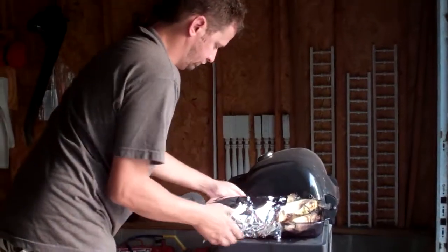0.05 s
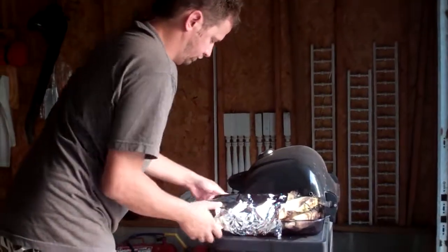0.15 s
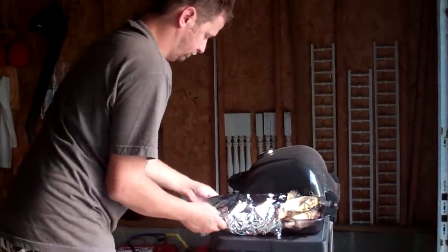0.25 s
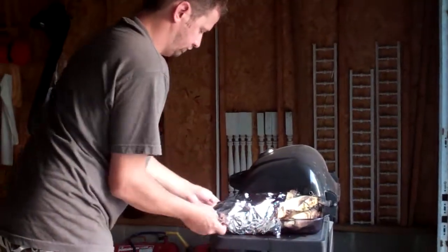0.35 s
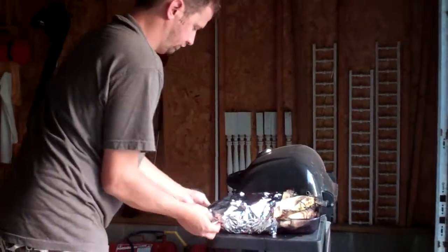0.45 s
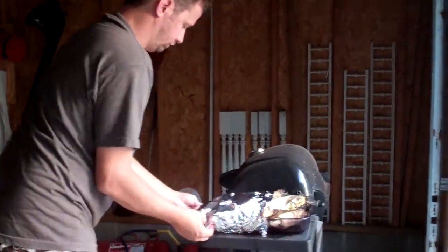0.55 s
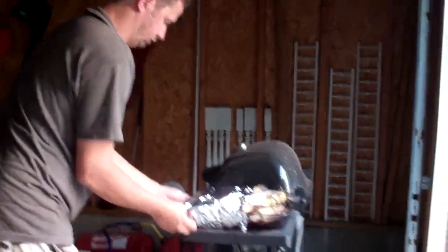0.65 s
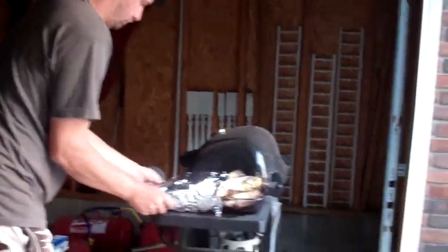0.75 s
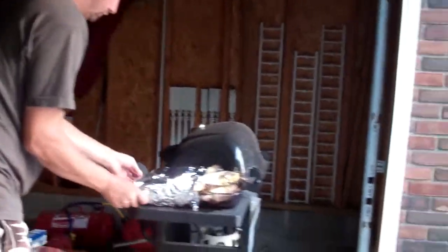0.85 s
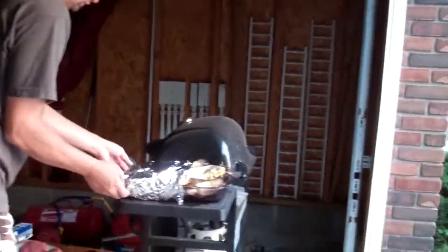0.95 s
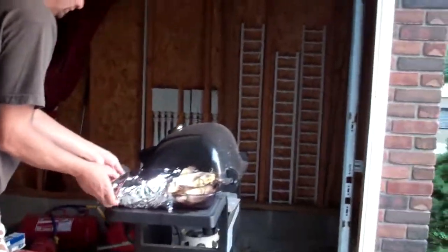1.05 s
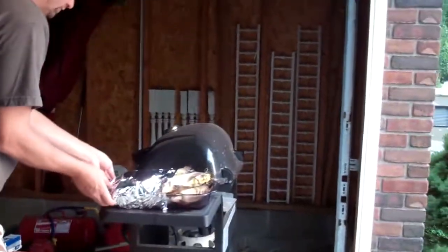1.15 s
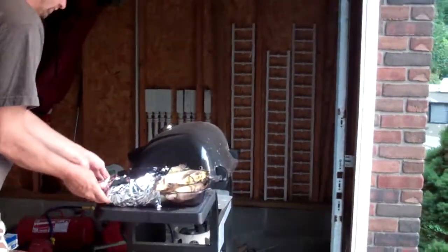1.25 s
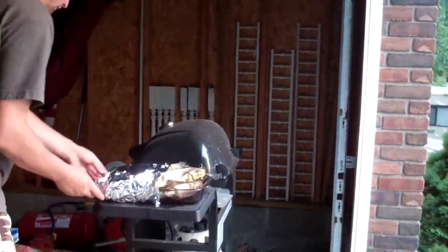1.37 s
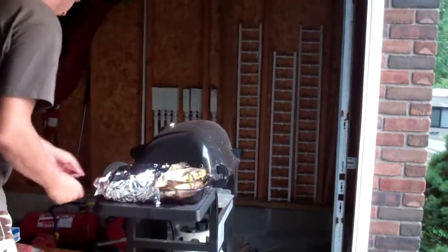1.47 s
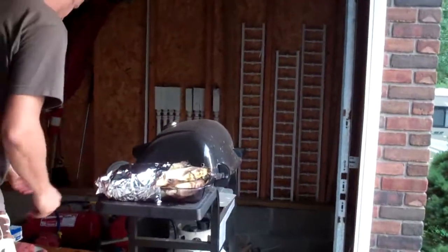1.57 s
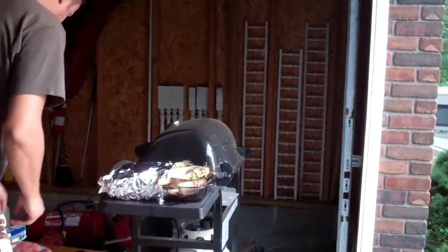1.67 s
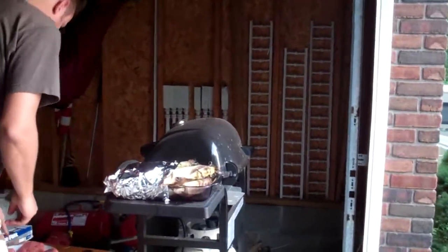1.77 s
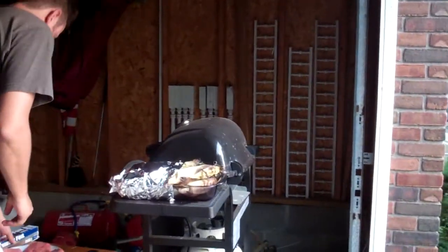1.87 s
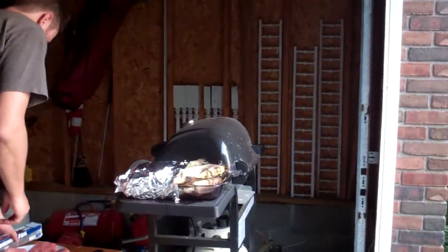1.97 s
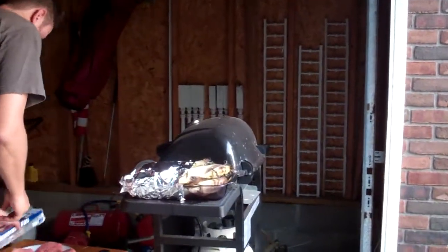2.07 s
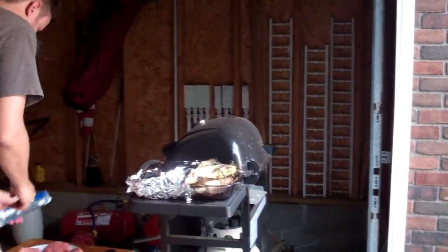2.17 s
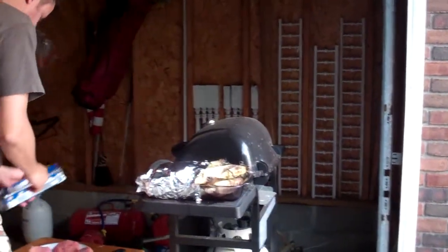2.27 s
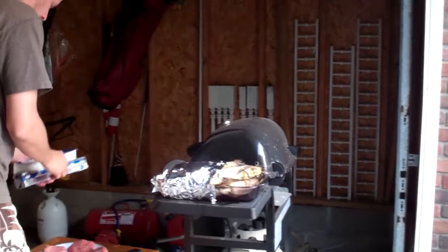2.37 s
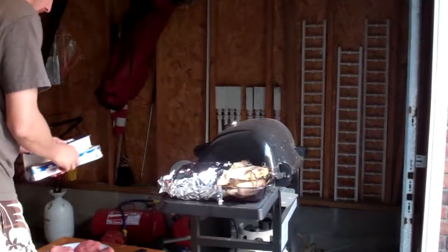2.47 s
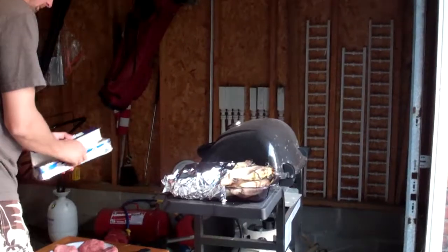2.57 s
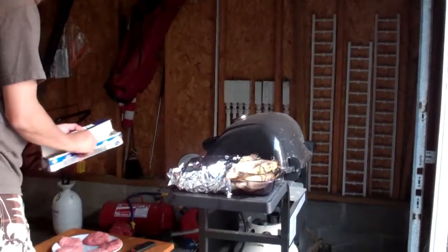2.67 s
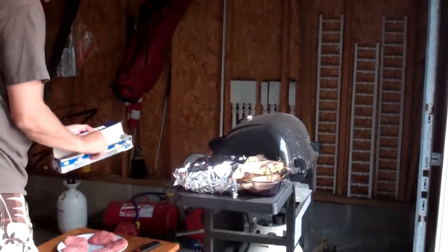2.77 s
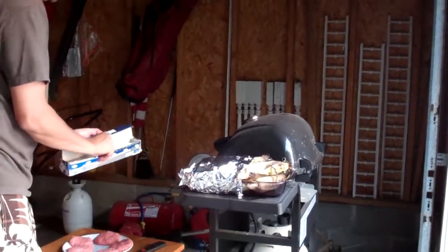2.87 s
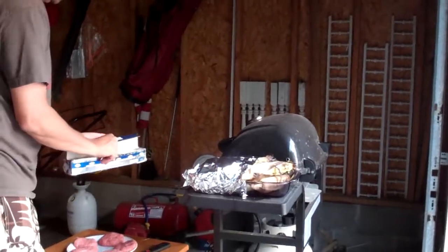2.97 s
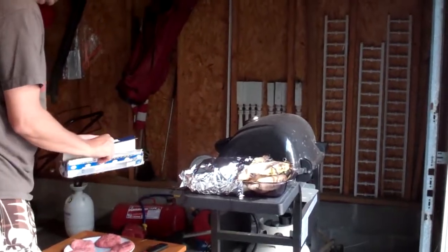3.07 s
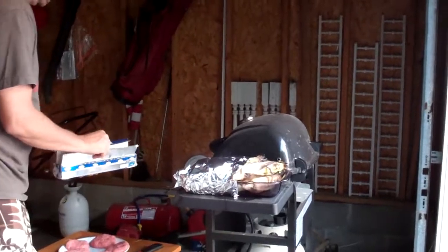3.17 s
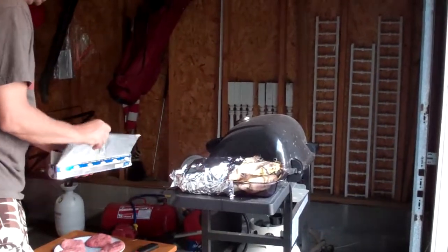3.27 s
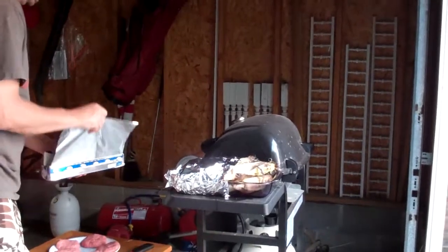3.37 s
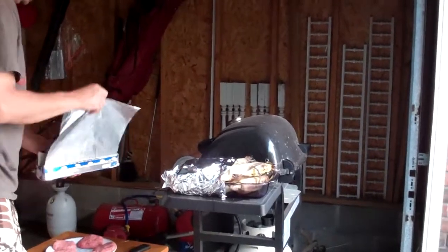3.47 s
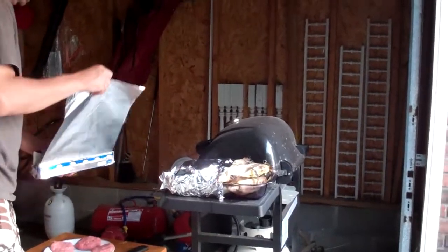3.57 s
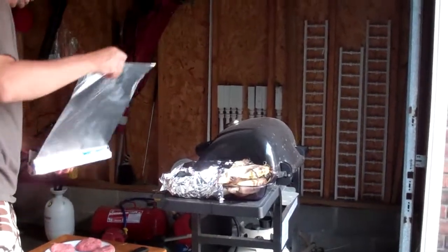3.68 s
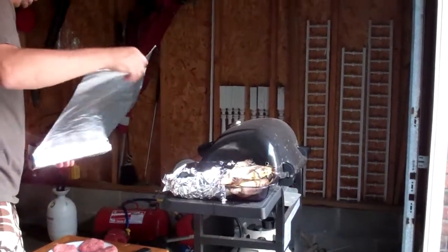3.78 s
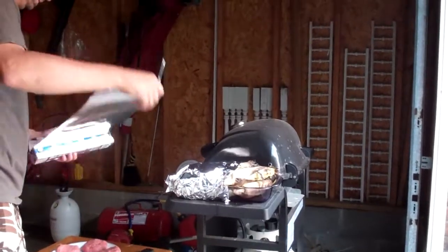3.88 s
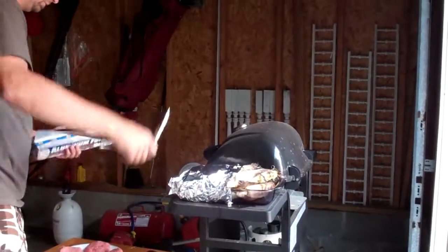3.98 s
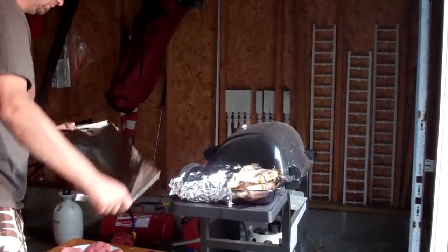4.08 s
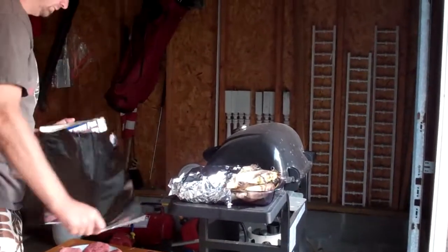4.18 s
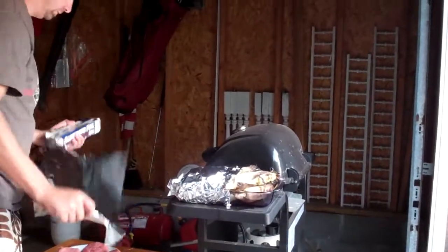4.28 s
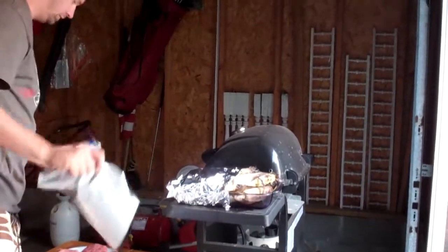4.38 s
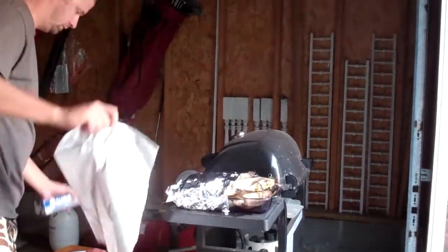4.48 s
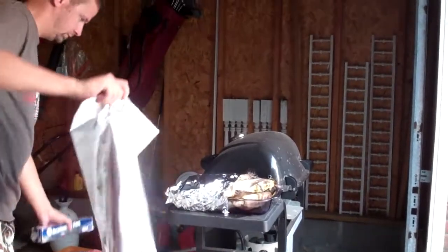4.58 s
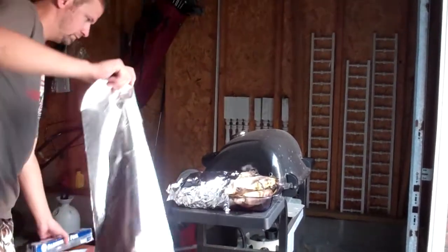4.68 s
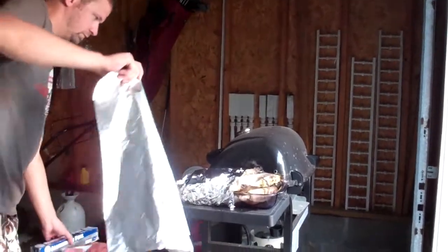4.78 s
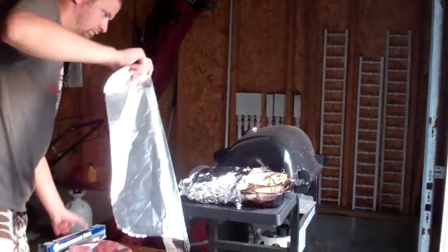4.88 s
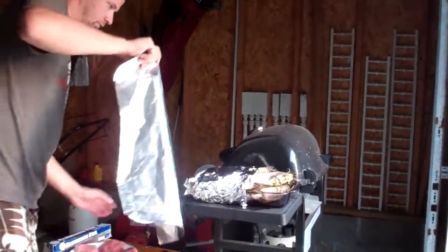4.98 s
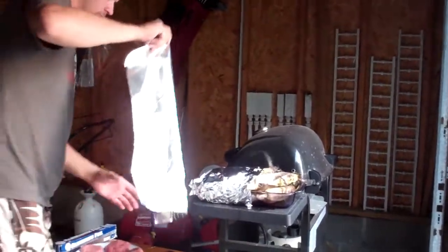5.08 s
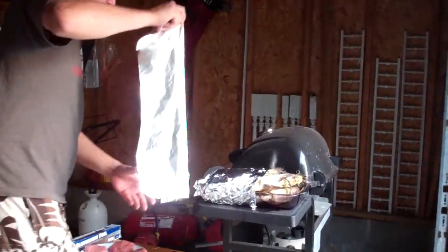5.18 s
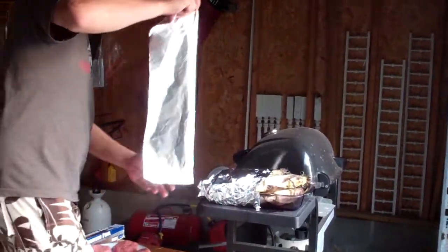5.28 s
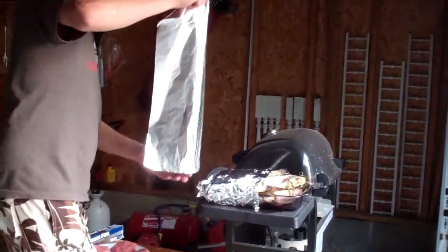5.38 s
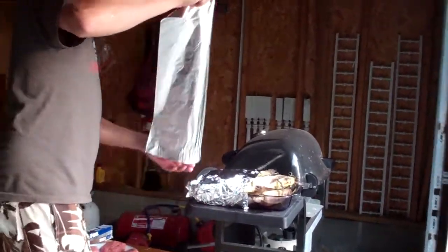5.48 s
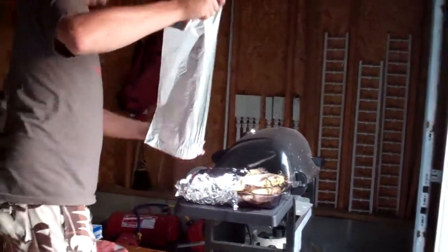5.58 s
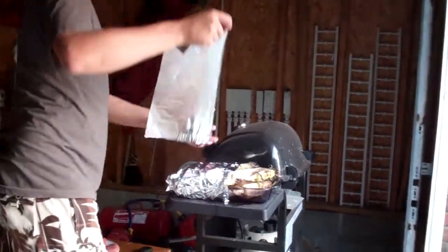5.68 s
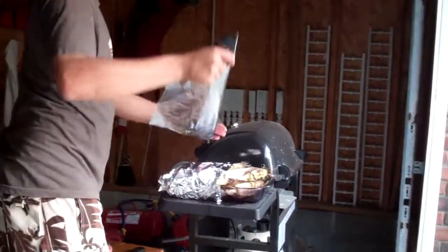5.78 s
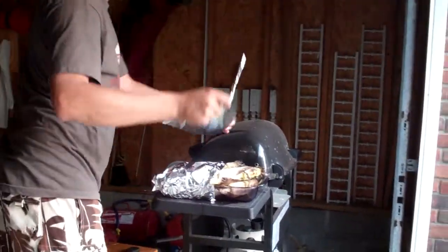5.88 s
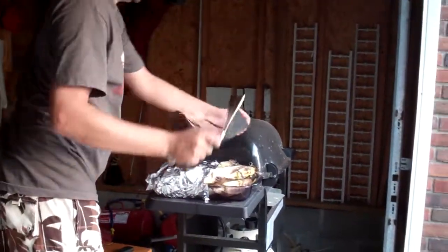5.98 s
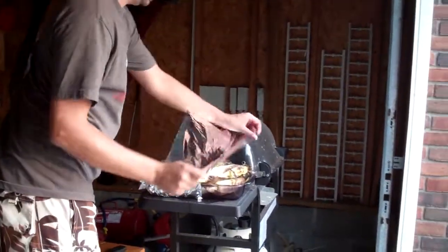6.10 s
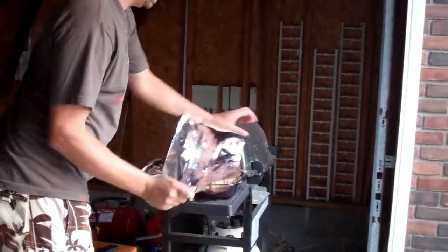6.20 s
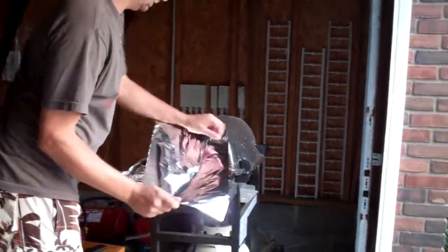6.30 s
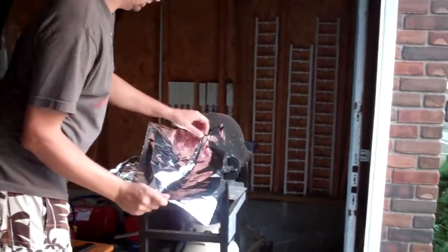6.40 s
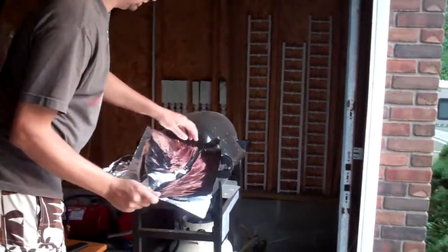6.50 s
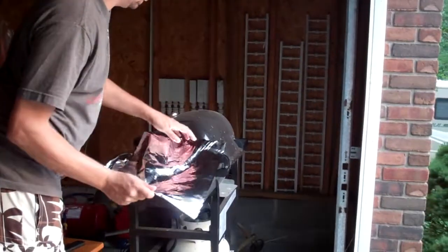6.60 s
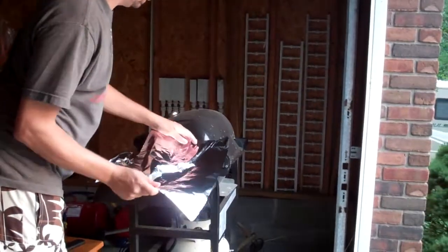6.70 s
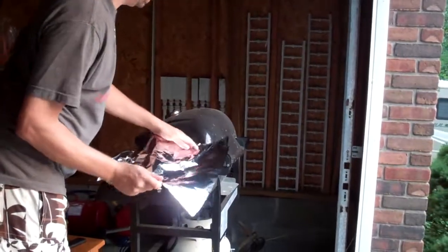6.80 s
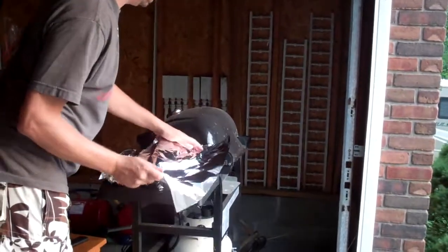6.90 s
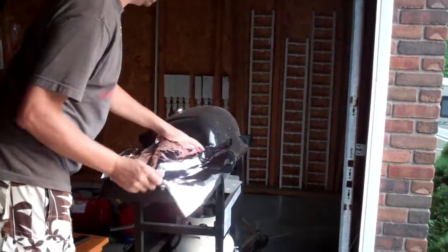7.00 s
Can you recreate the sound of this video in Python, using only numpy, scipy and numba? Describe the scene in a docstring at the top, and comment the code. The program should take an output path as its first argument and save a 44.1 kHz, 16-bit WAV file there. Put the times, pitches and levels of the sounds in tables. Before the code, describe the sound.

Crisp crackling of handled aluminium foil comes in two spells, over faint crickets and the low hum of a motorbike pulling away.

```python
"""Aluminium foil crackles and snaps as hands press, unroll, tear and wrap it in an open garage.
Each buckle is an impulse that sets a tiny facet of the sheet into damped vibration; knocks ring the
modes of a cardboard box, and the bare walls reverberate. Outside, a motorbike idles, revs and pulls
away through its gears, its firing harmonics shaped by the resonances of the exhaust pipe.
Crickets trill by stridulation over the hush of the summer air."""
import sys
import numpy as np
from scipy import signal
from scipy.fft import rfft, irfft
from scipy.io import wavfile
from scipy.ndimage import uniform_filter1d
from numba import njit

SR = 44100
rng = np.random.default_rng(int(sys.argv[2]) if len(sys.argv) > 2 else 0)


def unload_audio(sound):
    """Save the sound as a 16-bit wav file, at the path given as the first command line argument."""
    columns = np.transpose(np.atleast_2d(sound))
    # keep every value between -1 and 1, then stretch to whole-number steps
    steps = np.round(np.clip(columns, -1, 1) * 32767)
    wavfile.write(sys.argv[1], SR, steps.astype(np.int16))


N = 310894
TOP_HZ = 14170  # upper band limit
# Spectral envelope of the foil: f/Hz, level/dB
FOIL_SPECTRUM = [(300, -21.5), (600, -25), (1100, -19), (1800, -15), (4000, -7.5), (9000, -6.5),
                 (12000, -6), (14200, 1)]


def foil_rustle():
    """Superposition: a dense rain of independent buckles merges into a rustle, in quick flurries."""
    draws = rng.random((N // 3, 6)).T
    t = draws[5] * (N - 1) / SR
    hz = 300 + (TOP_HZ - 300) * draws[4] ** 1.3
    folds, middle, treble = curves(handling(), t)
    flurry_db = 0.96 * flurries(per_s=50, fade_s=0.006)[(t * SR).astype(int)]
    register = np.interp(np.log(hz), np.log([800, 4000, 11000]), [0, 1, 2])  # folds, middle, treble
    lower_db = folds * (1 - register) + middle * register
    upper_db = middle * (2 - register) + treble * (register - 1)
    db = np.where(register < 1, lower_db, upper_db) + flurry_db
    return buckles(t, hz, db, draws, cycles=30.1)


def foil_snaps(count=70):
    """Snap-through: a crease gives way in a thinning burst of buckles around one pitch."""
    # Foil snaps; at 2.72-3.10 s faint ticks, pitched in the crickets' band near 7.5 kHz:
    # t/s, level/dB, f/Hz
    snaps_and_ticks = [(0.0444, -24, 7350), (0.192, -20, 12000), (0.211, -27, 13040), (0.2292, -12, 11100),
                       (0.3646, -4, 14100), (0.4494, -22, 11300), (0.524, -11, 13600), (0.562, -7.5, 11000),
                       (0.584, -11, 3970), (0.592, -14, 784), (0.616, -12, 9000), (0.681, -29, 9000),
                       (0.7344, -10, 2440), (0.8835, -14.5, 2880), (0.919, -18, 9050), (0.951, -7.5, 2300),
                       (1.002, -10, 13800), (1.02, -15, 4400), (1.036, -12, 3800), (1.052, -15, 3200),
                       (1.122, -16, 12000), (1.19, -11.5, 9000), (1.1975, -12.5, 1300), (1.245, -15, 755),
                       (1.2514, -11, 3760), (1.381, -13.5, 5300), (2.72, -21.5, 7530), (2.76, -26, 7500),
                       (2.864, -23, 7530), (2.887, -25, 7400), (2.9324, -20.5, 7500), (2.9597, -24, 7400),
                       (3, -21, 7180), (3.0677, -21.5, 7620), (3.1036, -18, 7600), (3.121, -15, 11900),
                       (3.1596, -14, 13000), (4.0118, -26, 12100), (4.1218, -19, 12300), (4.126, -10, 4000),
                       (4.1544, -15, 5000), (4.4836, -17, 13700), (4.518, -17, 11200), (4.601, -11, 13600),
                       (4.64, -16, 6000), (4.692, -12, 12000), (4.8398, -11.5, 7700),
                       (4.9756, -13.5, 10600), (5.007, -16, 13000), (5.1339, -6, 13300), (5.625, -5, 13700),
                       (6.1984, -9, 13900), (6.4358, -9, 13750), (6.6069, -6.5, 13100),
                       (6.7384, -12, 13200), (6.97, -11, 11900)]
    t, snap_db, centre_hz = np.repeat(np.array(snaps_and_ticks), count, axis=0).T
    draws = rng.random((len(t), 6)).T
    delay_s = -np.log(1 - draws[5]) * .005
    hz = np.clip(centre_hz * 2 ** (1.45 * (2 * draws[4] - 1) ** 3), 400, TOP_HZ)
    db = snap_db - 11 - envelope_db(FOIL_SPECTRUM, centre_hz) - 3.1 * np.log2(hz / centre_hz)
    return buckles(np.minimum(t + delay_s, N / SR), hz, db, draws, cycles=10.5)


def buckles(t, hz, db, draws, cycles):
    """Impulse excitation: facets pop in or out and ring freely, a few much louder than the rest."""
    # Stereo balance set by where the hands are: f/Hz, left minus right/dB
    balance = [(300, 2.5), (1300, 0), (4400, 1), (8100, 1.5), (14200, 2.5)]
    # Path of the sheet: t/s, lead of the left channel/microseconds
    sheet_path = [(0, 1.1), (1.4, 5.6), (3.1, 17.4), (4.3, 16), (5.0, 15), (5.7, 8.9), (7.05, 8.7)]
    t60 = cycles * (.5 + draws[0]) / hz
    scatter_db = -2 * np.log(1.01 - draws[1])
    polarity = np.sign(draws[2] - .5)
    size = undb(db + envelope_db(FOIL_SPECTRUM, hz) + scatter_db) * (hz / 8000) ** 0.7 * polarity
    pan = undb(envelope_db(balance, hz) / 2)
    # pops come from all over the sheet: left and right phases part as the wavelength shrinks
    spread = (draws[3] - .5) * np.clip(hz / 2000, 0, 2.8)
    lag = 2 * np.pi * hz * curves(sheet_path, t)[0] / 10 ** 6
    return damped_modes((t * SR).astype(np.int64), hz, t60, size * pan, size / pan, spread - lag)


def handling():
    """Incoherent gestures add in power. Returns rows of t/s, folds/dB, middle/dB, treble/dB."""
    # Grips, pulls and folds: t/s, length/s, treble/dB, middle facets and large folds/dB re treble
    gestures = [(-0.03, 0.034, -27.5, -1, 17.5), (0.2, 0.15, -23, 0.5, 16), (0.421, 0.046, -26, 2, 16),
                (0.518, 0.11, -25, 1, 13), (0.648, 0.11, -28, 1.5, 17), (0.879, 0.08, -27, 2, 18),
                (0.988, 0.097, -30, 5, 17.5), (1.11, 0.077, -29.5, 3.5, 15), (1.17, 0.08, -29.5, -6, 23.5),
                (1.26, 0.092, -34, 0.5, 11), (1.88, 1.14, -51.5, 0, 25.5), (1.922, .1, -42.5, 6, 21),
                (2.245, 0.027, -48.5, 12, 21), (2.446, .08, -43, -4, 22), (2.702, 0.053, -41, 2, 20),
                (2.87, 0.26, -45, 4, 6), (3.091, .1, -29, 2, 17), (3.207, 0.2, -22.5, -1.5, 10.5),
                (3.406, 0.26, -22.5, -1, 3), (3.694, 0.17, -22.5, -3, 4.5), (3.856, 0.059, -24.5, 0, 0),
                (3.973, 0.097, -21, -1, 2.5), (4.096, 0.062, -17, -1, 6.5), (4.2, 0.076, -25.5, -4.5, 8.5),
                (4.366, .04, -29, -5, 11), (4.452, 0.14, -32.5, 0.5, 17), (4.578, 0.16, -23.5, 0.5, 8),
                (4.724, 0.17, -28.5, 2.5, 14.5), (4.976, 0.12, -28, 3.5, 11),
                (5.133, 0.058, -31.5, 5.5, 10), (5.194, 0.15, -35.5, 5, 13),
                (5.346, 0.066, -27.5, -0.5, 12), (5.468, 0.22, -36, 4, 18), (5.606, .16, -22, -1, -2),
                (5.774, 0.041, -22, -4, -4), (5.835, 0.09, -25, -0.5, 8), (5.978, 0.087, -23.5, 0, 7),
                (6.066, 0.12, -23, -0.5, 9.5), (6.17, 0.033, -17.5, -9, -1), (6.234, 0.082, -24.5, -2, 2),
                (6.327, 0.036, -25.5, 0, 11), (6.415, 0.22, -24.5, 1, 10), (6.659, 0.15, -24, -0.5, 7),
                (6.802, 0.12, -23.5, 0, 12.5), (6.948, 0.071, -33.5, 8, 17)]
    attack_s, release_db_per_s = .03, [127, 160, 277]  # large folds settle slowly, small facets fast
    rest_db = [-27, -73, -49]  # the sheet never lies quite still
    t = np.arange(0, N / SR + .002, .002)
    power = np.outer(undb(rest_db) ** 2, np.ones(len(t)))
    for start, length, db, middle_db, folds_db in gestures:
        rise = np.clip((t - start) / attack_s, 0, 1) ** 2
        fall_db = np.outer(release_db_per_s, np.maximum(t - start - length, 0))
        power = power + rise * undb(db + np.array([[folds_db], [middle_db], [0]]) - fall_db) ** 2
    return np.column_stack([t, *(10 * np.log10(power))])


def flurries(per_s, fade_s):
    """Shot noise: random kicks that die away, on a log scale with unit spread."""
    kicks = (rng.random(N) < per_s / SR) * rng.exponential(size=N)
    activity = np.log(1.1 + signal.lfilter([1], [1, -np.exp(-1 / (fade_s * SR))], kicks))
    return (activity - activity.mean()) / activity.std()


def box_knocks(contacts=8):
    """Modal vibration: each knock is a few quick contacts that ring the cardboard, never quite alike."""
    # Knocks on the box: t/s, level/dB, time spread/s
    knocks = [(1.931, -32.5, 0.02), (1.996, -42, 0.027), (2.283, -43, 0.041), (4.188, -36, 0.024),
              (4.218, -38, 0.032), (4.245, -39.5, 0.02)]
    # Modes of the box: f/Hz, level/dB, T60/s before clipping
    modes = [(775, -6, 0.1), (930, 7.5, 0.058), (1350, 1, 0.044), (1880, -6, .02), (2440, 2.5, 0.014)]
    rows = [(t, spread, hz, knock_db + mode_db, t60)
            for t, knock_db, spread in knocks for hz, mode_db, t60 in modes]
    t, spread, hz, db, t60 = np.repeat(rows, contacts, axis=0).T
    force, detune, lateness = rng.standard_normal((len(t), 3)).T
    size = undb(db - 8.5 + 0.89 * force - 1.7 * lateness ** 2)  # later contacts are weaker
    start = ((t + spread * lateness ** 4 / 3) * SR).astype(np.int64)
    return damped_modes(start, hz * (1 + 0.058 * detune), np.clip(t60, .01, .05), size, size, 0 * size)


def motorbike():
    """Source and filter: the exhaust pipe shapes the firing harmonics; gas rasps after each firing."""
    # Firing rate: t/s, f/Hz
    revs = [(0, 15.65), (1.14, 15.5), (1.35, 16.4), (1.49, 17.0), (1.63, 23.5), (1.75, 23.5), (1.9, 25.75),
            (2.49, 26.6), (2.71, 26.8), (3.0, 26.2), (3.15, 24.5), (3.33, 29.3), (3.47, 27.1), (3.57, 28.3),
            (3.75, 29.4), (3.96, 31.8), (4.08, 31.7), (4.42, 34.7), (4.57, 36.9), (4.79, 38.8),
            (5.01, 40.0), (5.16, 42.5), (5.26, 42.8), (5.45, 45.0), (5.6, 44.2), (5.65, 44.8), (5.93, 53.2),
            (6.04, 48.9), (6.32, 49.7), (6.58, 54.2), (6.73, 53.3), (6.87, 55.1), (7.05, 54.6)]
    # Pipe tones, shifting as the bike moves between walls: t/s, boom f/Hz, boom width/Hz, bark f/Hz
    pipe_tones = [(0, 142, 11, 303), (1.35, 143.6, 7.8, 297), (1.7, 144, 22, 246), (2.0, 154.6, 13, 248),
                  (2.9, 161.2, 9.4, 241), (3.3, 149.6, 27, 254), (3.8, 150, 20, 244), (4.5, 161, 40, 254),
                  (5.0, 167, 86, 279), (5.45, 154, 69, 304), (5.6, 156, 45, 277), (6.1, 155, 30, 285.4),
                  (6.6, 165, 69, 272), (7.05, 164, 57, 274)]
    # Exhaust levels: t/s, boom/dB, then thud, bark and rasp/dB re boom
    exhaust_levels = [(0, -52.5, -5, -6, -10), (1.2, -47.5, -15, -20, -15), (1.29, -46, -14, -11, -7),
                      (1.36, -51, -3, -9, -18), (1.58, -53, -2, -8, -25), (1.64, -42.5, -4, -4, -22),
                      (1.69, -38.5, -6, -6.5, -29), (1.8, -38, -7, -6, -21), (1.96, -40, -3.5, -3, -8),
                      (2.33, -44, 2, 0, -22), (2.5, -40, -2, -3.5, -15), (2.9, -41, -3, -3, -23),
                      (3.12, -52.5, 7, -1, -5), (3.26, -39, -7, -5.5, -6), (3.6, -39.5, -16, -10, -9),
                      (3.9, -47, -5, 1, -7), (4.0, -40.5, -9, -0.5, -6), (4.16, -59.5, -3, 4, -16),
                      (4.4, -54, 6, 4, -16), (4.6, -45, -0.5, 3.5, -3), (5.03, -44, 12, 14.5, 1.5),
                      (5.14, -39, 1, 8.5, -1.5), (5.36, -41, -8, 12, -1), (5.48, -36.5, -18, 8.5, -2.5),
                      (5.57, -31, -17, 1, -13), (5.64, -36, 0, 1, -7), (5.86, -32, -3.5, -6, -12.5),
                      (5.96, -31.5, 4, -2, -5.5), (6.09, -22.5, -8, -8.5, -19.5), (6.24, -33, 0, -4, -12),
                      (6.36, -31.5, -12, -2.5, -19), (6.5, -27.5, -7, -7.5, -8), (6.58, -29.5, -2, -3, -4),
                      (6.68, -32, 1, -5, -8), (6.81, -32, 2, -3.5, -6.5), (6.89, -31.5, -8, 0, -13),
                      (7.05, -31, 1, -6, -9)]
    step = 32  # samples per control value
    t = np.arange(0, N, step) / SR
    firing_hz, = curves(revs, t)
    boom_hz, boom_width, bark_hz = curves(pipe_tones, t)
    boom_db, thud_db, bark_db, rasp_db = curves(exhaust_levels, t)
    hold = lambda control: np.repeat(control, step)[:N]
    mode = lambda hz, centre_hz, width_hz: 1 / (1 + 2j * (hz - centre_hz) / width_hz) ** 2
    firings = np.cumsum(hold(firing_hz) * (1 + 0.0015 * wander(25))) / SR
    harmonics = 0
    for k in range(1, 31):
        hz = k * firing_hz
        boom = 1.54 * mode(hz, boom_hz, boom_width)
        thud = mode(hz, 112.8, 44.4)
        bark = mode(hz, bark_hz, 34.3) + undb(-6.5) * mode(hz, 1.141 * bark_hz, 177) ** 2
        pipe = (boom + undb(thud_db) * thud + undb(bark_db) * bark) * undb(boom_db)
        waver = undb(1.1 * wander(7))  # air paths make each partial waver
        harmonics = harmonics + np.real(hold(pipe) * waver * np.exp(2j * np.pi * k * firings))
    gas = rng.standard_normal(N) + 0.96 * rng.standard_normal((2, N))  # scattered: channels partly differ
    puffs = np.exp(-(firings % 1) / 0.64) * gas
    low_rasp = resonator(resonator(puffs, 1444, 470), 1456, 470)
    high_rasp = resonator(resonator(puffs, 2500, 500), 2500, 500)
    rasp = hold(undb(boom_db + rasp_db)) * at_rms(low_rasp + undb(-6.5) * high_rasp, 0)
    turbulence = resonator(resonator(rng.standard_normal(N), 250, 215), 250, 215)
    chuff = hold(undb(boom_db + bark_db)) * at_rms(turbulence, -12)  # blurs the gaps between partials
    return (harmonics + rasp + chuff) * undb(0.83 * wander(35))  # no two firings are equally strong


def yard(sound):
    """Path difference: sound from the right reaches the left channel late; a house front echoes it."""
    # Reflection from the house front: delay/s, level/dB, extra delay on the right/s
    echoes = [(.031, -15.5, 0.00042)]
    delayed = lambda channel, lag_s: np.pad(sound[channel], (round(lag_s * SR), 0))[:N]
    direct = np.array([delayed(0, 3 / SR), sound[1]])
    return direct + sum(undb(db) * np.array([delayed(0, lag), delayed(1, lag + skew)])
                        for lag, db, skew in echoes)


def crickets():
    """Stridulation: each chirp is three wing strokes into one resonance."""
    # Singers: f/Hz, chirp rate/Hz, T60/s, level/dB before ducking, left minus right/dB
    singers = [(7730, 51, 0.041, -52.5, -16), (7313, 70, 0.027, -49.5, 3), (7180, 120, 0.011, -52.5, 15),
               (4810, 65, 0.042, -60, 15), (12200, 17, .004, -59, 25)]
    # Cricket level, ducking under the loud foil as with a recorder's gain control: t/s, level/dB
    ducking = [(0, 7), (1.5, 5.5), (3.1, 3), (4.2, -8), (4.6, -1), (5.3, 8.5), (7.05, -3)]
    trills = 0
    for hz, rate, t60, db, pan_db in singers:
        chirps = int(rate * N / SR)
        jitter, chirp_db, detune = rng.standard_normal((chirps, 3)).T
        chirp_t = (np.arange(chirps) + 0.12 * jitter) / rate + 0.0089
        t = np.repeat(chirp_t, 3) + np.tile([0, .002, .004], chirps)
        size = np.repeat(undb(chirp_db), 3)
        wing_hz = np.repeat(hz * (1 + 0.0091 * detune), 3)
        left, right = size * undb(pan_db / 2), size * undb(-pan_db / 2)
        phase = 2 * rng.standard_normal(len(t))
        trill = damped_modes((t * SR).astype(np.int64), wing_hz, np.full(len(t), t60), left, right, phase)
        trills = trills + at_rms(trill, db)
    return trills * undb(curves(ducking, np.arange(N) / SR)[0])


def garage(sound, t60_s=0.87, tail_db=-3.5):
    """Reverberation: bare walls add an exponential tail whose channels differ in the treble."""
    t = np.arange(int(.5 * SR)) / SR
    mid, side = rng.standard_normal((2, len(t))) * undb(-60 * t / t60_s) * (t > .003)
    side = highpass(side, 5000)
    tail = np.array([mid + side, mid - side])
    tail /= np.sqrt(np.sum(tail[0] ** 2))
    return sound + undb(tail_db) * signal.fftconvolve(sound, tail, axes=1)[:, :N]


def summer_air():
    """Partial coherence: outdoor hush and microphone hiss, alike left and right in the bass only."""
    # Background spectrum: f/Hz, level/dB
    spectrum = [(40, 11), (100, 5), (200, 11), (500, -13), (1000, -6), (2200, -2), (5000, 3.5),
                (8500, -1.5), (10500, -65), (14000, 0)]
    hz = np.maximum(np.arange(N // 2 + 1) * SR / N, 20)
    mid, side = rfft(rng.standard_normal((2, N))) * undb(envelope_db(spectrum, hz))
    side = side * np.clip(hz / 4000, .03, .9)
    return at_rms(irfft(np.array([mid + side, mid - side]), N), db=-43.5)


@njit
def damped_modes(start, hz, t60, left, right, right_phase):
    """Free vibration: a sum of decaying sines, each with its own phase in the right channel."""
    out = np.zeros((2, N))
    for m in range(len(start)):
        pole = np.exp(2j * np.pi * hz[m] / SR - np.log(1000.) / (t60[m] * SR))
        right_gain = right[m] * np.exp(1j * right_phase[m])
        swell, phasor = 0., 1. + 0j
        for i in range(start[m], min(start[m] + int(t60[m] * SR), N)):
            swell += (1 - swell) * 2 * hz[m] / SR  # builds up over about half a cycle
            out[0, i] += swell * left[m] * phasor.imag
            out[1, i] += swell * (right_gain * phasor).imag
            phasor *= pole
    return out


def resonator(x, hz, width_hz):
    """Second-order resonance with unit gain at its centre."""
    return signal.lfilter(*signal.iirpeak(hz, hz / width_hz, SR), x)


def highpass(x, hz):
    """Second-order roll-off below hz."""
    return signal.sosfilt(signal.butter(2, hz, "high", fs=SR, output="sos"), x)


def wander(rate_hz):
    """Random modulation: straight ramps between random values, spread near 1."""
    span = int(SR / rate_hz)
    return 1.56 * uniform_filter1d(np.repeat(rng.standard_normal(N // span + 1), span), span)[:N]


def undb(db):
    """Decibels to amplitude ratio."""
    return 10 ** (np.asarray(db) / 20)


def at_rms(x, db):
    """x scaled to an RMS level."""
    return x * undb(db) / np.sqrt(np.mean(x ** 2))


def curves(table, t):
    """Columns of a table interpolated at times t."""
    times, *columns = np.transpose(table)
    return [np.interp(t, times, column) for column in columns]


def envelope_db(points, hz):
    """A spectral envelope interpolated on a logarithmic frequency axis."""
    f, db = np.transpose(points)
    return np.interp(np.log(hz), np.log(f), db)


def scene():
    """Superposition of the foil and box in the garage and the sounds outside."""
    foil = highpass(foil_rustle() + foil_snaps(), 380)  # the foil's crackle stays clear of the bass
    return garage(foil + box_knocks()) + yard(motorbike()) + crickets() + summer_air()


def record(dry):
    """Band limiting: a small camera drops the deepest rumble and cuts the top steeply."""
    top_cut = signal.ellip(14, .3, 100, TOP_HZ, fs=SR, output="sos")
    return signal.sosfilt(top_cut, highpass(dry, 78))


dry = scene()
out = record(dry)
unload_audio(out)
```